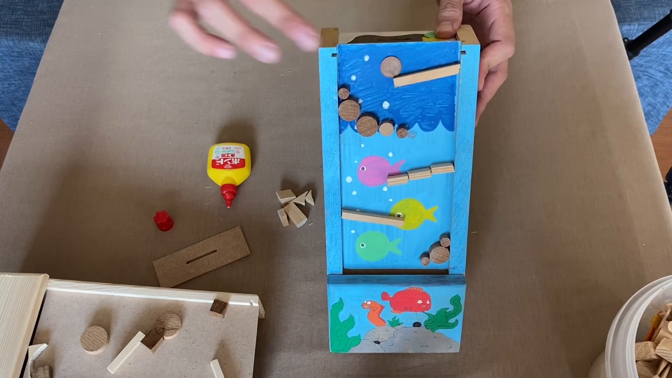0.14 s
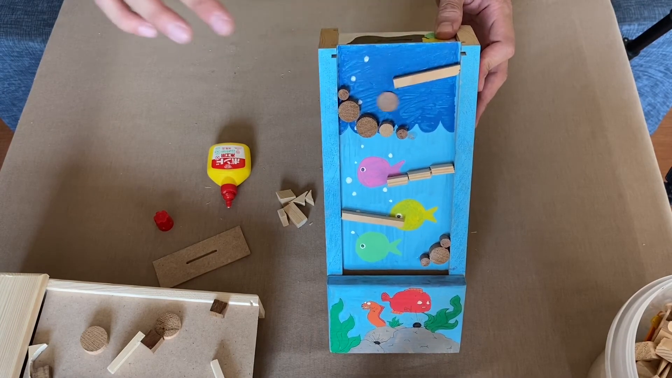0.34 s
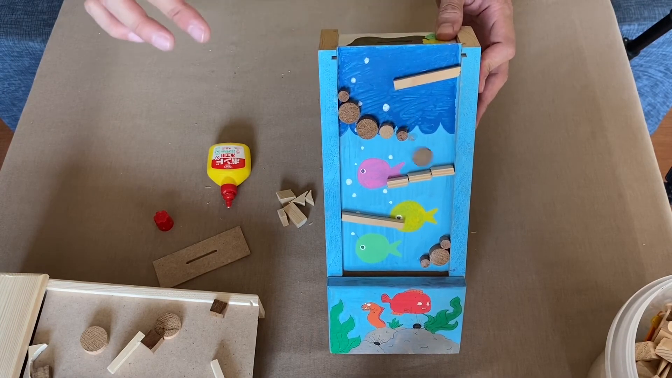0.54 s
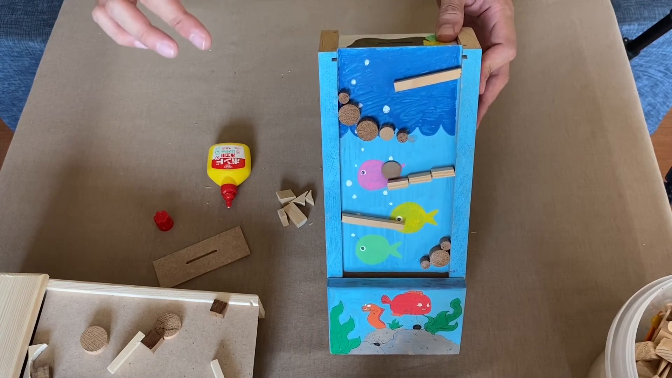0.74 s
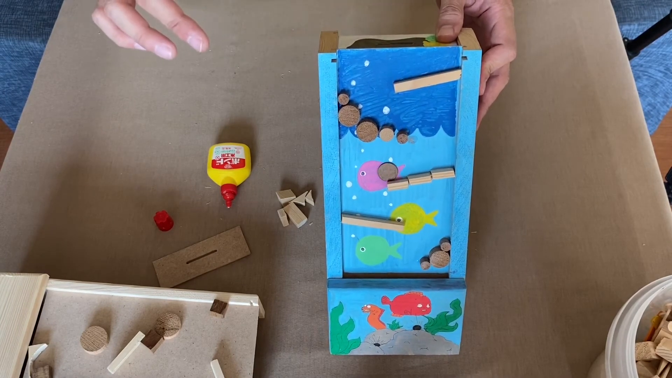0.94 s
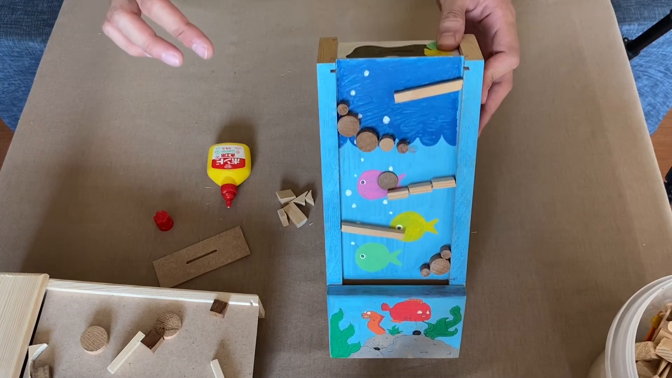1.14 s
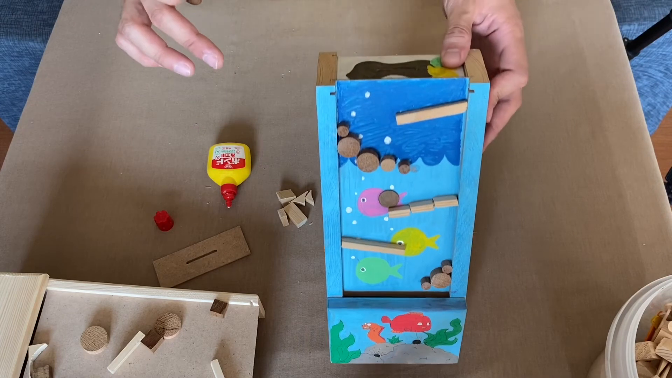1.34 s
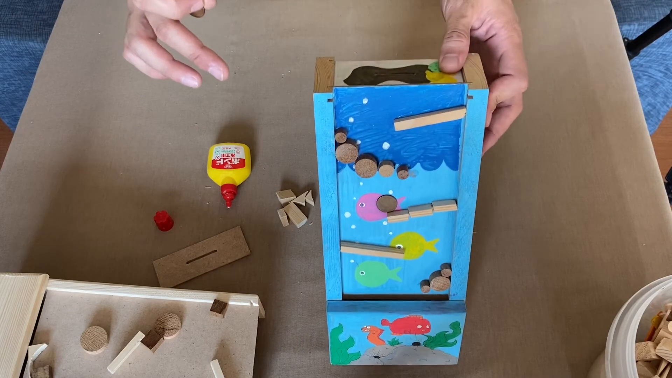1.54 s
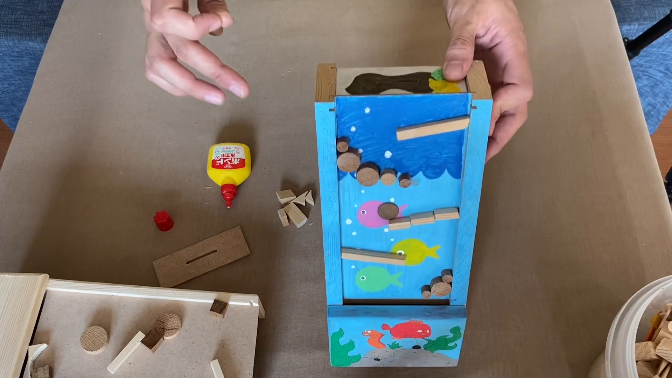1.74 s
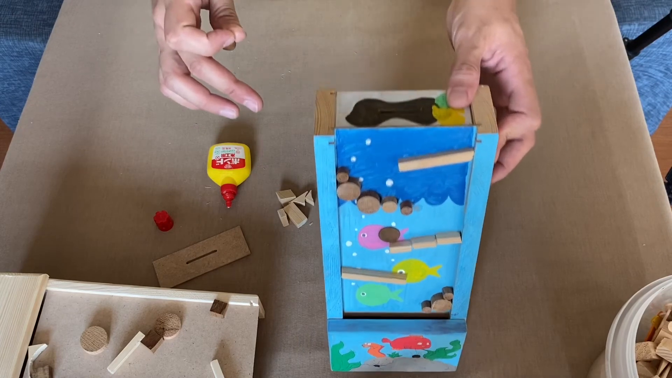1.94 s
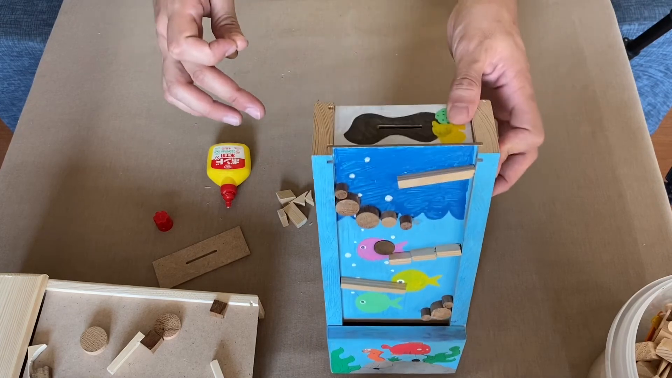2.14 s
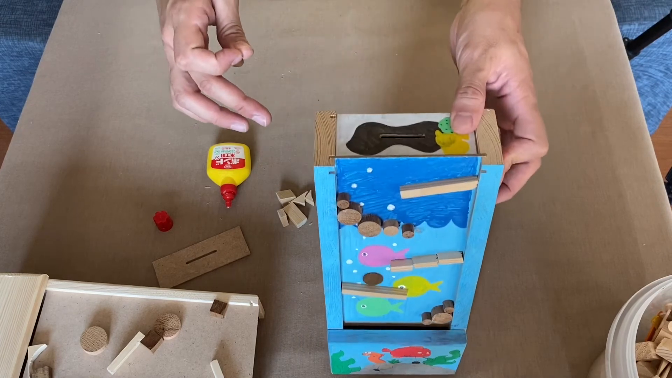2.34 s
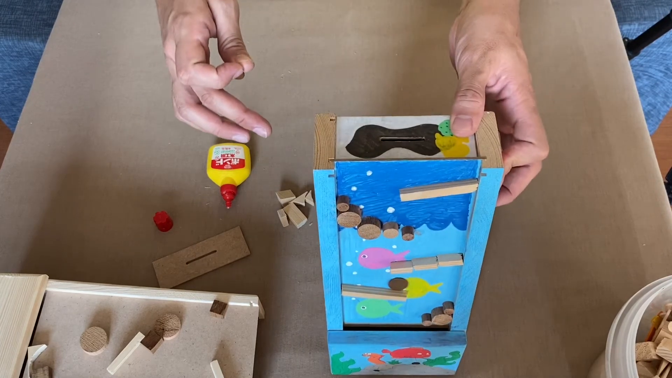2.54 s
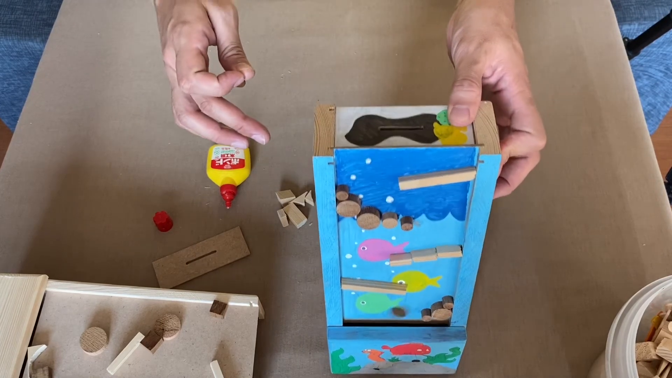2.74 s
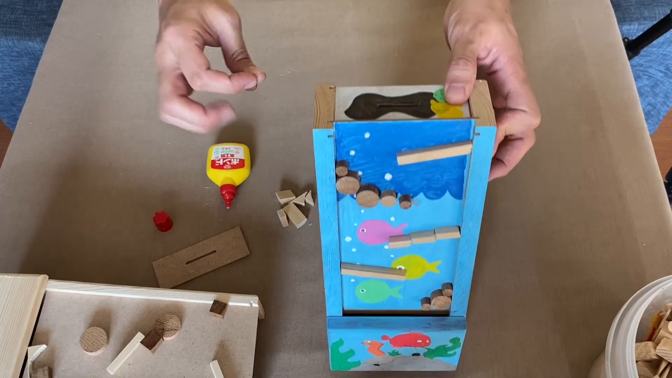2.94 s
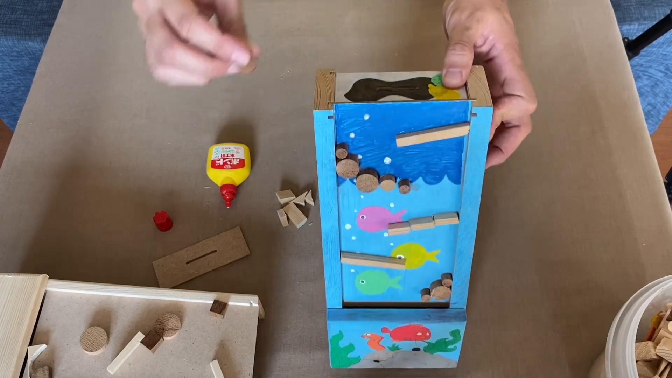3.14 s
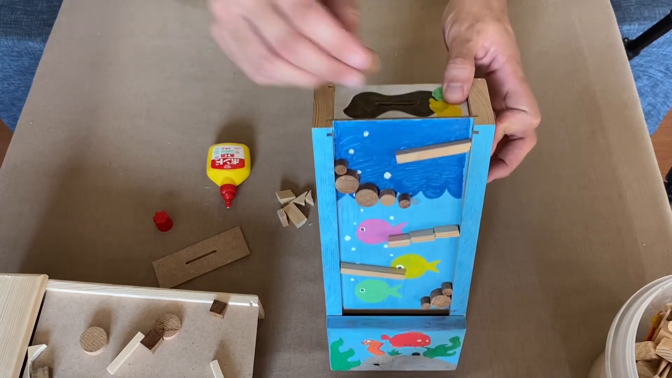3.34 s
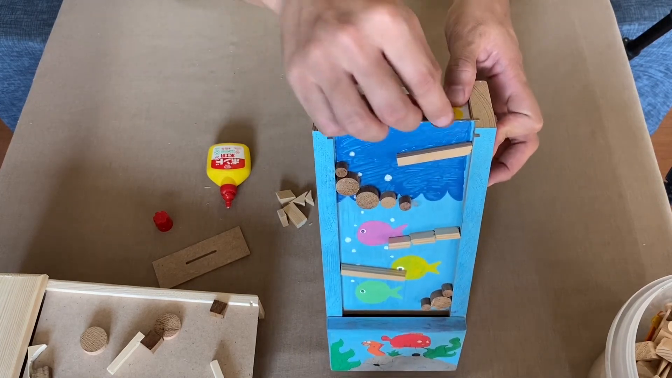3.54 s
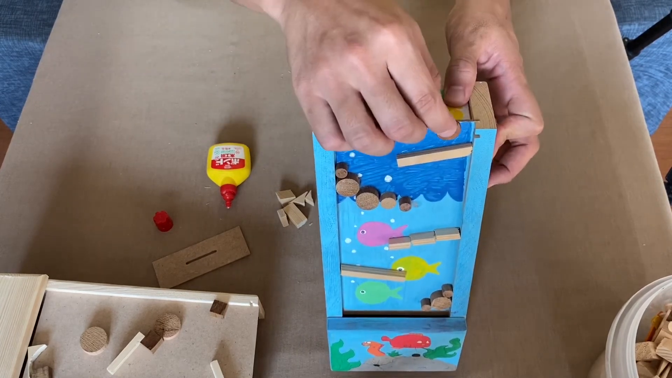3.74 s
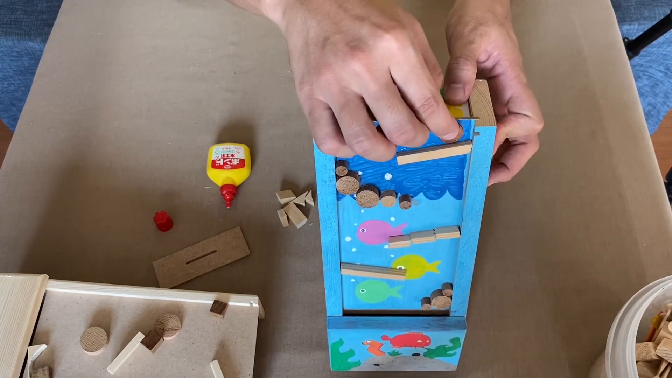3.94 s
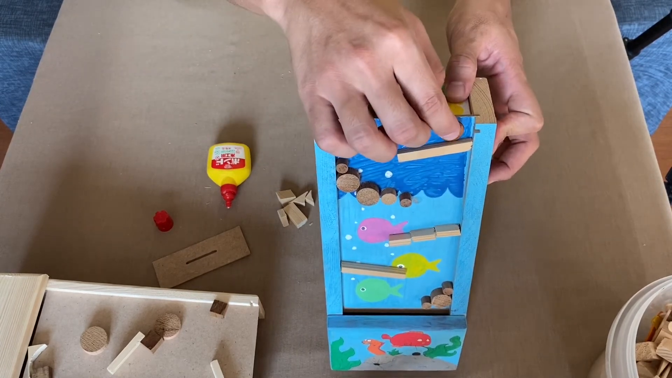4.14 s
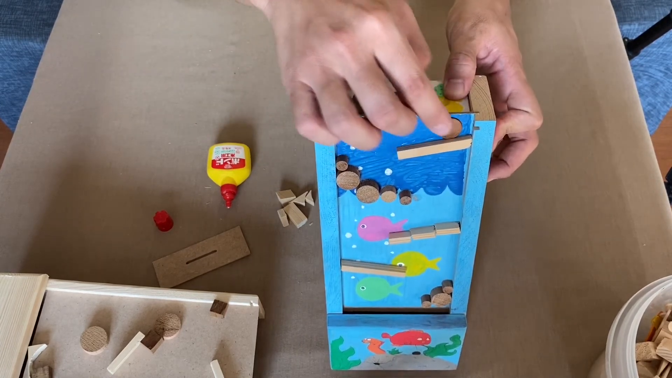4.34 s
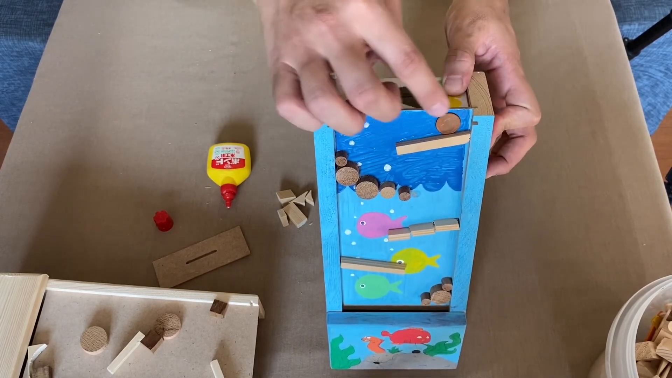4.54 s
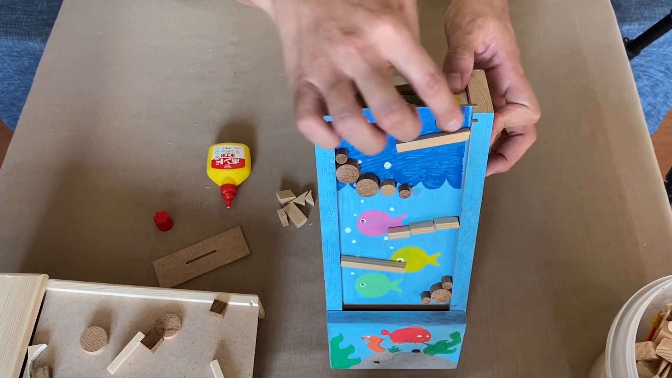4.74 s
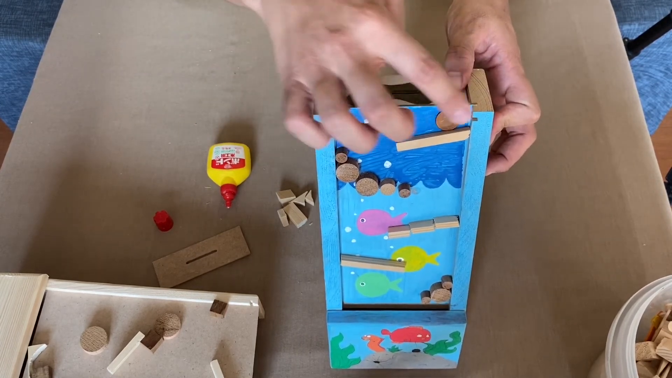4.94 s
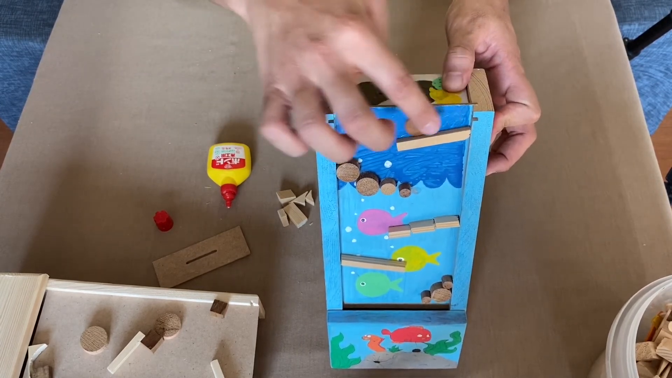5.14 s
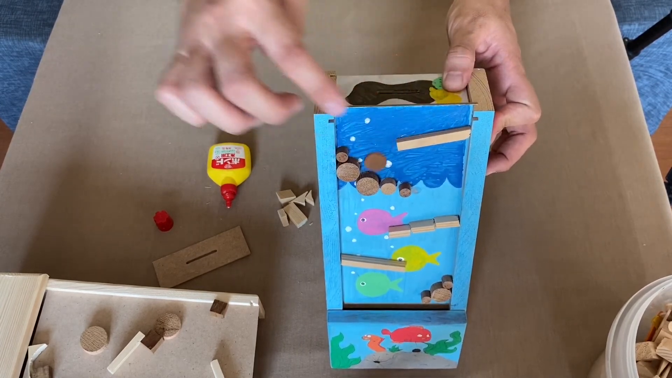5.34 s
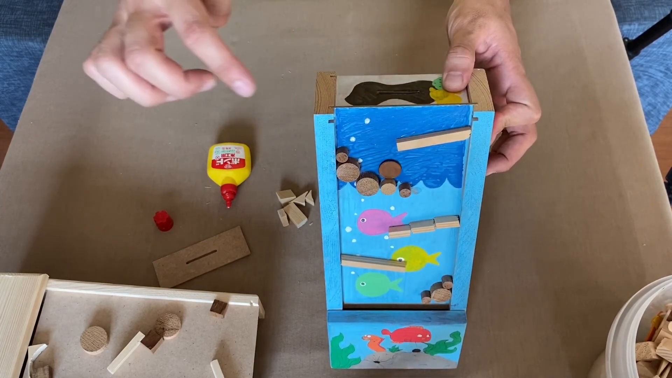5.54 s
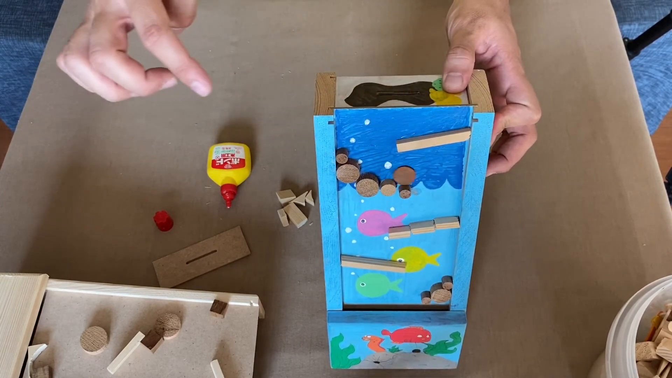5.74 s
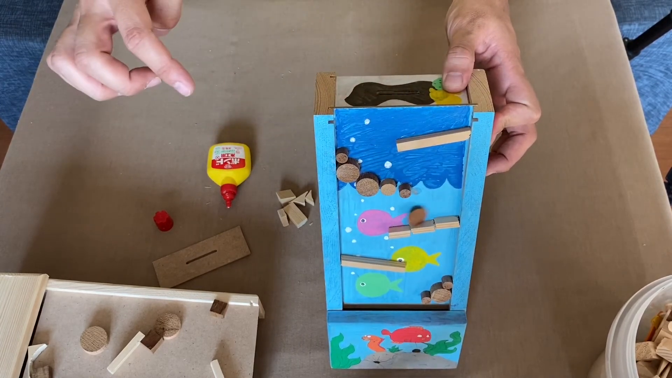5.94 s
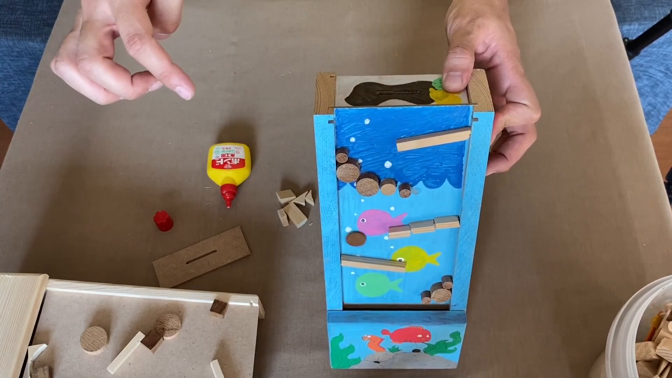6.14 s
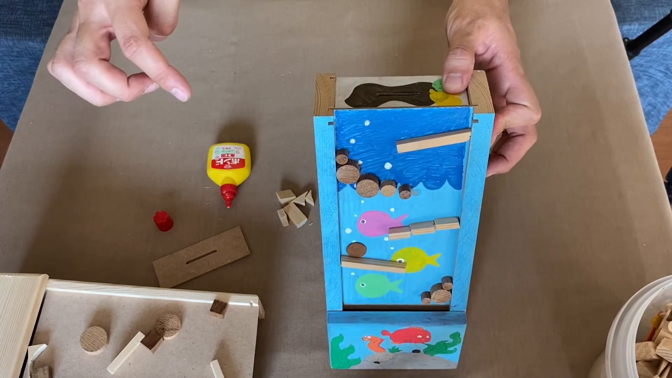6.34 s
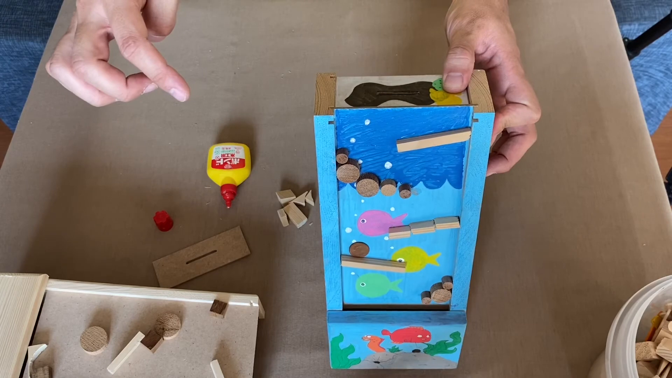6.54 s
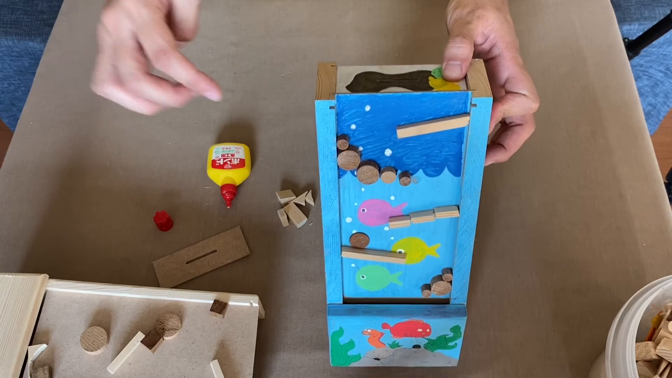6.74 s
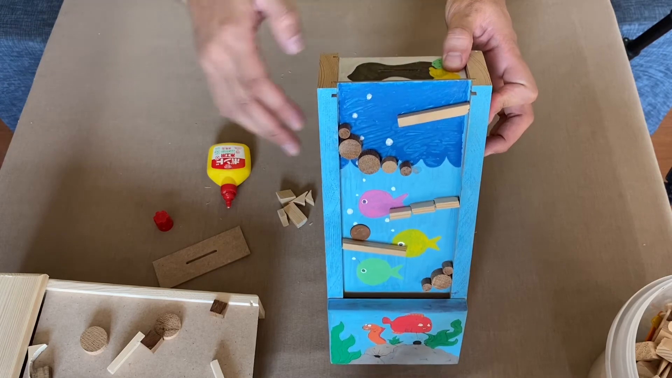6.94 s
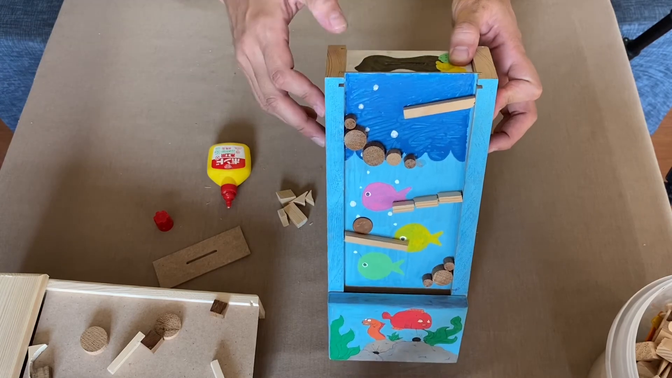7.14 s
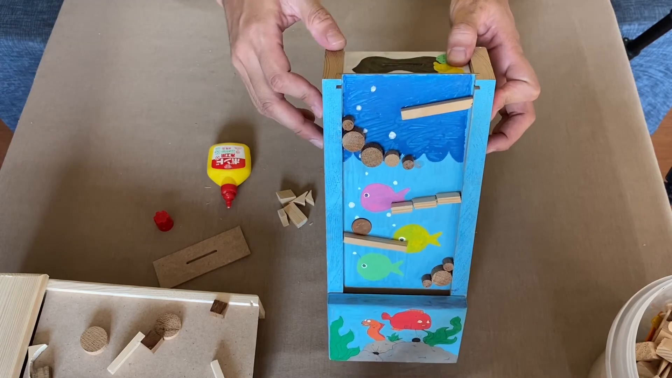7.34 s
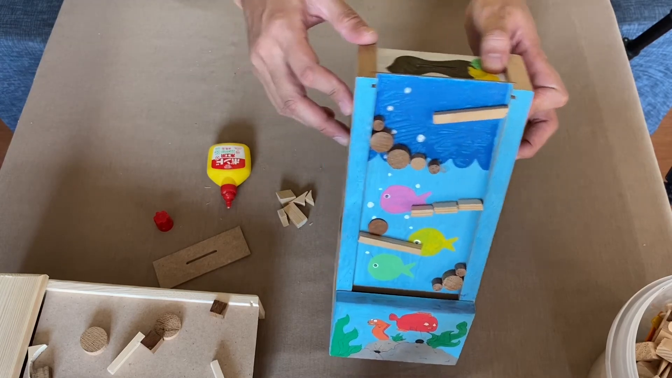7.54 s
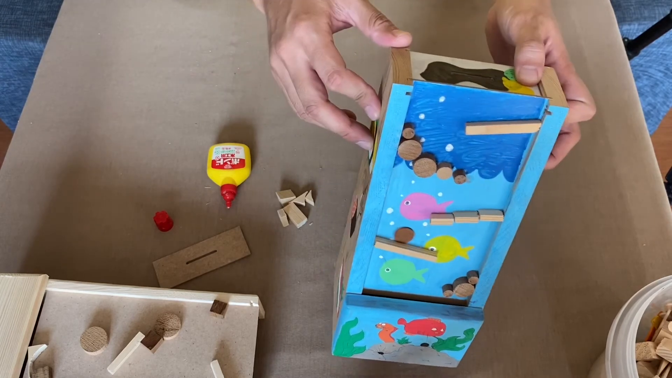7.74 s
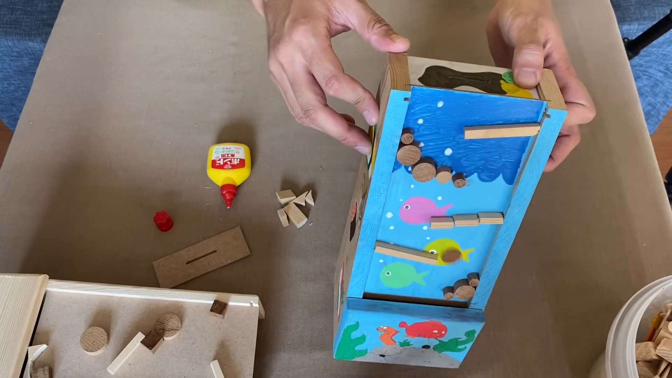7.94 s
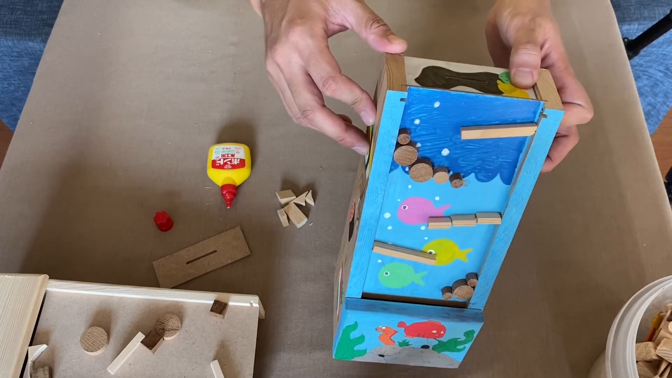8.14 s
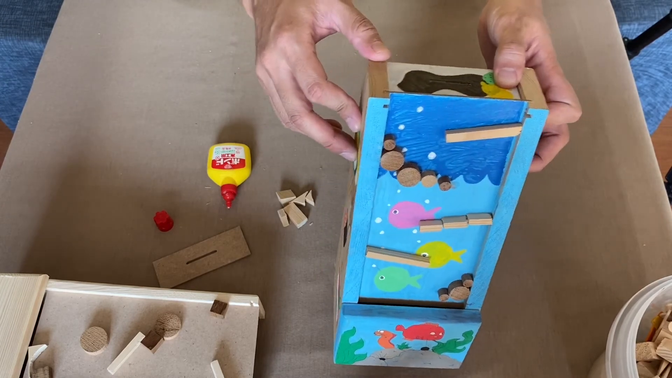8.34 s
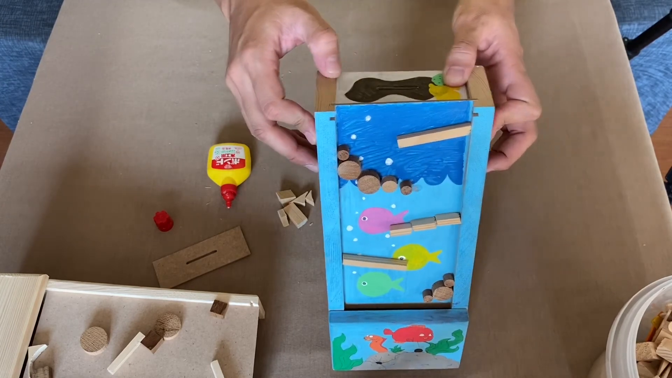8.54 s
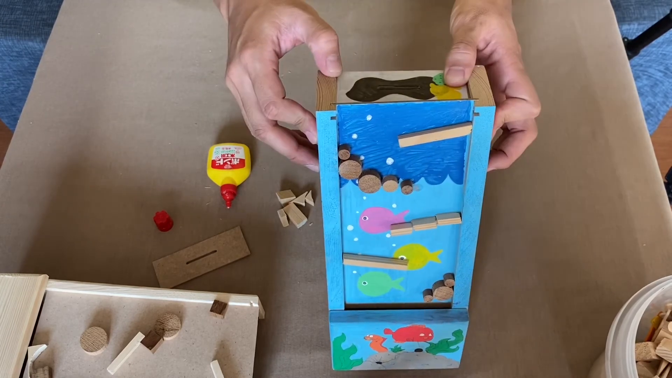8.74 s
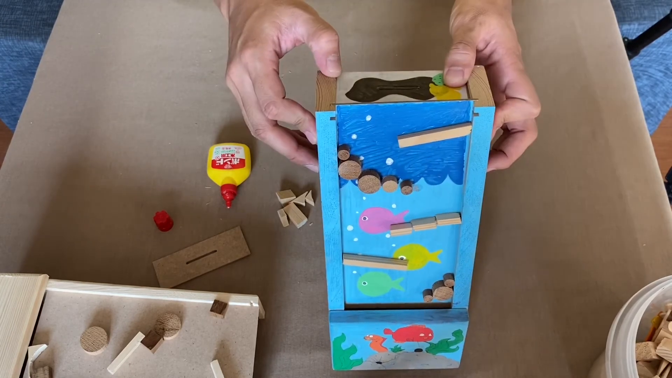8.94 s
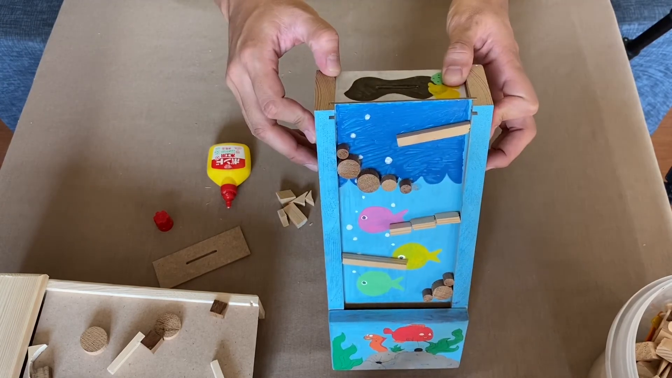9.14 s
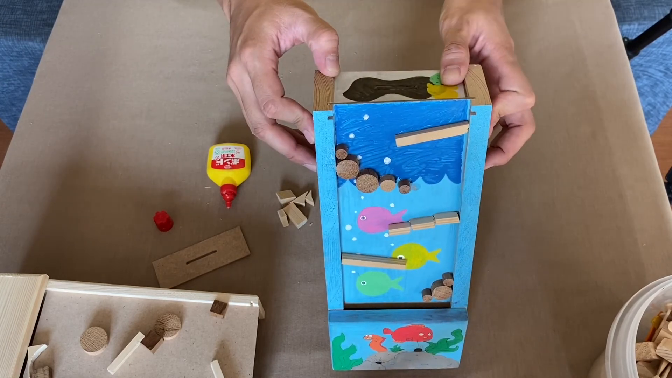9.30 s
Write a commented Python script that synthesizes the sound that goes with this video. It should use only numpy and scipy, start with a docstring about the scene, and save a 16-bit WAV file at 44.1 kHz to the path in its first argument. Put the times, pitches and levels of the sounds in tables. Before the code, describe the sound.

Close, dry wooden clacks and rattling rolls as coins bounce down a zigzag toy; one pauses, then tips free with sharp knocks.

```python
"""Small room: coins run down a hand-held wooden money box with a zigzag of ramps and pegs, heard close.
Coins roll, click on pegs, bounce on ledges and drop into the hollow base; one sticks and is tilted free.
Blows are noise bursts plus damped modes; rolling and rubbing are filtered random taps.
Hands rumble, the room rushes low, and the hardest blows overload the microphone."""
import sys
import numpy as np
from scipy import signal
from scipy.fft import rfft, irfft, next_fast_len
from scipy.io import wavfile
from scipy.ndimage import map_coordinates

SR = 44100
rng = np.random.default_rng(int(sys.argv[2]) if len(sys.argv) > 2 else 0)


def unload_wav(signal):
    """Save mono or channel-first audio to the path in sys.argv[1] as 16-bit WAV at rate SR, clipped to [-1, 1]."""
    wavfile.write(
        sys.argv[1],
        SR,
        np.round(np.clip(np.atleast_2d(signal).T, -1, 1) * 32767).astype(np.int16),
    )


N = 417627

# Flatness: above 0 face-on and dull, below 0 edge-on and bright.
# top ramp and round pegs: start_s, level_db, flatness_db
PEG_HITS = [(0.301, -2.5, -0.5), (0.36, -12.5, 1), (0.393, -5, -2), (0.446, -17.5, -13), (0.528, -9.5, 0.5),
            (0.614, -16.5, 10.5), (0.693, -25, 6), (2.641, -15.5, -4.5), (2.676, -12, -1.5),
            (2.698, -4, -2.5), (5.237, -22, 2), (5.263, -17, 1.5), (5.289, -12.5, -8), (5.308, 3.5, -7.5),
            (5.409, -1, 1.5), (5.458, -8, 3.5), (5.489, -6, 1.5), (5.547, -8, 0.5), (5.699, -9, 7.5),
            (5.811, -11.5, -10), (5.953, -8, 4.5), (5.97, -14, 11.5), (7.853, -28, 6.5), (7.894, -20, 2.5),
            (7.925, -16, -1.5), (7.933, -9.5, 3.5), (7.95, 2.5, -7.5), (7.986, -8, -11.5),
            (8.105, -18.5, -9.5)]
# lower ledges: start_s, level_db, flatness_db
LEDGE_HITS = [(2.246, 3, 0), (2.339, -1.5, -4), (2.391, -7.5, -4), (2.418, -10, 2), (5.88, 4.5, 4),
              (5.996, -7.5, 1.5), (6.05, -10.5, 0), (6.073, 2, 3.5), (6.179, -1, -1), (6.229, -9, -5),
              (6.257, -17.5, -11)]
# side wall at the exit: start_s, level_db, flatness_db
WALL_HITS = [(2.8335, 10, 3), (8.2645, 2, -12.5)]
# landings and bounces in the hollow base: start_s, level_db, flatness_db, hollow_note_hz
BASE_HITS = [(3.003, 9, 2, 1007), (3.027, -6.5, 1, 567), (3.066, 2, 3.5, 793), (3.12, -0.5, -5.5, 494),
             (3.138, -4, 2, 487), (3.339, -17.5, 3, 490), (3.491, -3, -2, 796), (3.556, -6.5, 1.5, 820),
             (3.598, -7.5, -3, 974), (8.138, 10.5, 0.5, 993), (8.186, -9.5, 4, 1000), (8.25, 3, -0.5, 986),
             (8.356, -8, 0, 791), (8.424, -3, -3, 796), (8.476, -0.5, -3, 844)]
# resonances of each struck part: mode_hz, width_hz, level_db
PEG_MODES = [(542.7, 6.2, 0.5), (798, 15, -2.5), (1064, 34, -7), (1517, 60, -6.5), (2457, 190, 10.5),
             (2880, 22, -1.5), (3160, 9.3, -15), (3758, 200, -5), (4250, 31, -1), (5170, 49, -14),
             (5240, 47, -5.5)]
LEDGE_MODES = [(545, 35, -12), (800, 70, -13), (1320, 45, -8), (1500, 55, -8), (1820, 70, -5),
               (1945, 65, -1), (2150, 110, -8), (2920, 90, -5), (3075, 62, 3), (3380, 70, -7),
               (3900, 170, -3), (4220, 140, -6), (4950, 160, -8), (5700, 220, -8), (6120, 170, -12)]
WALL_MODES = [(540, 40, -14), (960, 40, -1), (1015, 40, -2), (1885, 60, -2), (2030, 110, -4),
              (2500, 110, -5), (2880, 110, -6), (3370, 60, 4), (3700, 80, -9), (4390, 50, -5),
              (4850, 180, -9)]
BASE_MODES = [(495, 17, -6), (600, 8.1, -3.5), (773, 27, 1.5), (914, 22, -1.5), (1041, 29, 4.5),
              (1355, 67, 4), (1852, 96, -13.5), (2020, 41, -16.5), (2295, 200, 5), (2990, 38, 1),
              (2910, 28, -20.5), (3480, 210, -23), (4720, 24, -6.5), (4874, 120, -2.5), (5250, 100, -0.5)]
# back panel under a rolling coin: mode_hz, width_hz, level_db
PANEL_MODES = [(395, 50, -16), (570, 22, 0), (785, 35, -9), (1080, 50, -16), (1335, 55, -11)]
# ramps under a rolling coin: mode_hz, width_hz, level_db
RAMP_MODES = [(1338, 31, -3), (1970, 51, -0.5), (2380, 240, -3.5), (3034, 51, -1), (3385, 290, -9),
              (5400, 400, -11)]
# dense, quickly damped plywood vibration: freq_hz, gain_db
PLY_SPECTRUM = [(60, -36), (250, -6.5), (500, -3), (1150, -3.5), (1600, 2), (3000, 4), (4200, -3),
                (6000, -6), (7300, -25), (10000, -14.5), (13000, -32), (16000, -25.5)]
# click of the metal edge: freq_hz, gain_db
RIM_SPECTRUM = [(2000, -35.5), (6000, -5.5), (8000, 1), (10500, 1), (13000, -6.5), (16000, -8.5)]
# coin scraping along the ramp: freq_hz, gain_db
SCRAPE_SPECTRUM = [(210, -41), (350, -11), (535, -14.5), (677, -10), (793, -3.5), (1210, -23.5),
                   (1310, -9.5), (3020, -19.5), (6030, -29.5), (7280, -40), (9210, -25.5), (15000, -41.5)]
# skin on wood: freq_hz, gain_db
SKIN_SPECTRUM = [(300, -10.5), (1000, 2), (3000, -3), (6000, -7.5), (7500, -19), (10000, -9),
                 (15000, -20.5)]
# hands moving the box: freq_hz, gain_db
RUMBLE_SPECTRUM = [(15, -14), (30, 2), (60, 1), (130, 1), (300, -32), (1000, -71.5)]
# four runs of rolling and sliding, one list each: time_s, level_db
ROLL_RUNS = [
    [(0.0, -48), (0.28, -41), (0.458, -33.5), (0.548, -41.5), (0.65, -40.5), (0.782, -51), (0.86, -63.5)],
    [(2.1, -52), (2.172, -41.5), (2.32, -48.5), (2.502, -48), (2.788, -43.5), (2.83, -44)],
    [(4.98, -40.5), (5.404, -41), (5.554, -49.5), (5.782, -39.5), (5.904, -31.5), (5.998, -39),
     (6.106, -37.5), (6.244, -52), (6.32, -49)],
    [(7.6, -52), (7.778, -41), (8.022, -39.5), (8.094, -37), (8.388, -41), (8.43, -38), (8.548, -48.5),
     (8.6, -48.5)],
]
# back-panel booms where a coin gathers speed: start_s, level_db, rise_s
BOOMS = [(0.37, -41, .03), (0.64, -45, .03), (0.765, -39, .01), (2.715, -36, .03), (5.9, -39, .03),
         (7.925, -27.5, .035)]
# short coin slides and grazes, at the slot, along a ledge or just before a hard landing: start_s, level_db,
# rise_s
SLIDES = [(-0.02, -31.5, 0.014), (0.240, -28, 0.034), (2.160, -41.5, 0.021), (2.203, -33.5, 0.023),
          (3.481, -29.5, 0.0067), (5.005, -28.5, 0.013), (5.06, -36.5, .008), (5.868, -24.5, .005)]
# fingers shifting on the box: start_s, level_db, rise_s
RUBS = [(1.27, -65, 0.022), (1.68, -64, 0.018), (3.70, -54, 0.026), (3.83, -51, 0.035), (4.72, -68.5, .04),
        (6.60, -62, 0.05), (9.165, -52, 0.0089), (9.24, -49.5, .018)]
# dull hand rumbles: start_s, level_db, rise_s
BUMPS = [(0.15, -52, .08), (0.42, -50.5, .1), (1.6, -52, .06), (4.88, -55.5, .08)]
# room background: freq_hz, gain_db
AIR_SPECTRUM = [(12, -56.5), (20, -27.5), (42, -8), (197, 0), (344, -4), (374, -5.5), (406, -5), (508, -8),
                (1050, -14), (3890, -37.5), (5140, -44.5), (6080, -43.5), (7190, -64.5), (9770, -45),
                (15700, -68.5)]
# left-right likeness of the background: freq_hz, correlation
AIR_ALIKE = [(60, 0.96), (180, 0.94), (550, 0.08), (1650, 0.32), (4970, 0.15), (15000, 0.2)]
# phase by which the left port leads: freq_hz, lead_rad
PORT_LEAD = [(20, 0), (1700, 0.74), (2700, 0.45), (4200, 1.48), (5200, 0.98), (7500, 2.5), (10000, 9),
             (15000, -3)]
# room reverberation: freq_hz, t60_s
ROOM_T60 = [(200, 0.45), (530, 0.39), (1400, 0.41), (3700, 0.39), (9700, 0.29)]

TOP_HZ = 16000  # microphone band limit
HIT_SAMPLES = SR // 4
THUD_DB_PER_FLAT_DB, TICK_LOSS_DB_PER_FLAT_DB = 0.77, 0.43
THUD_FALL_DB_PER_DB = 0.31  # thud lags the force
ROLL_FADE_S = 0.044
LEDGE_NOTE_HZ = 3072


def amp(db):
    """Decibels to gain."""
    return 10 ** (np.asarray(db) / 20)


def unit(x):
    """Scale to rms 1."""
    return x / np.sqrt(np.mean(x ** 2) + 1e-20)


def along(points, hz):
    """Interpolate (freq_hz, value) points on a log frequency axis."""
    freq_hz, value = np.transpose(points)
    return np.interp(np.log(hz + 1), np.log(freq_hz + 1), value)


def filtered(x, response):
    """Apply a complex frequency response."""
    n = x.shape[-1]
    m = next_fast_len(n + 8192)
    return irfft(rfft(x, m) * response(np.fft.rfftfreq(m, 1 / SR)), m)[..., :n]


def coloured(x, gain):
    """Minimum-phase filter of a short sound: nothing rings before the blow."""
    m = 2 * len(x)
    log_gain = np.log(np.maximum(gain(np.fft.rfftfreq(m, 1 / SR)), 1e-6))
    cepstrum = irfft(log_gain)
    # fold the cepstrum onto positive time
    cepstrum[1:m // 2] *= 2
    cepstrum[m // 2 + 1:] = 0
    return irfft(rfft(x, m) * np.exp(rfft(cepstrum)))[:len(x)]


def band_rms(x, lo_hz, hi_hz):
    """Strength of one band over the first 20 ms of a blow."""
    head = x[:SR // 50]
    hz = np.fft.rfftfreq(len(head), 1 / SR)
    band = rfft(head)[(hz > lo_hz) & (hz < hi_hz)]
    return np.sqrt(2 * np.sum(np.abs(band) ** 2)) / len(head)


def room(x, wet_db):
    """Direct sound at two microphone ports plus a diffuse tail with frequency-dependent decay."""
    hz, t, noise = signal.stft(rng.standard_normal((3, SR // 2)), SR, nperseg=256)
    decay = amp(-60 * t / along(ROOM_T60, hz)[:, None])
    build_up = 1 - np.exp(-t / 0.0022)
    tails = signal.istft(noise * decay * build_up, SR, nperseg=256)[1]
    tail = tails[:2] + 0.67 * tails[2]  # the third is common to both ports
    wet = signal.fftconvolve(x[None], tail / np.linalg.norm(tail[0]), axes=1)
    half_lead = np.array([[.5], [-.5]])
    direct = filtered(x, lambda f: np.exp(1j * along(PORT_LEAD, f) * half_lead))
    return amp(wet_db) * wet + np.pad(direct, ((0, 0), (0, wet.shape[1] - len(x))))


def place(out, start_s, sound):
    """Add a stereo sound at its start time."""
    out[:, round(start_s * SR):][:, :sound.shape[1]] += sound


def taps(rate_hz, spread_db):
    """Random tiny impacts of very unequal strength."""
    struck = rng.random(N) < rate_hz / SR
    return struck * rng.standard_normal(N) * amp(spread_db * rng.standard_normal(N))


def swells(strokes):
    """Envelope of strokes that swell softly, peak one rise_s after the start, and fade."""
    t = np.arange(N) / SR
    pressure = np.zeros(N)
    for start_s, level_db, rise_s in strokes:
        u = np.clip((t - start_s) / rise_s, 0, 20)
        pressure += amp(level_db) * u * np.exp(1 - u)
    return pressure


def background(level_db, pan_db):
    """Steady low room rush: left and right alike in the bass, largely independent above."""
    def mid_side(f):
        turn_rad = np.arccos(np.clip(along(AIR_ALIKE, f), -1, 1)) / 2
        return amp(along(AIR_SPECTRUM, f)) * [np.cos(turn_rad), np.sin(turn_rad)]

    mid, side = filtered(rng.standard_normal((2, N)), mid_side)
    return amp(level_db) * unit(np.array([mid + side, mid - side])) * amp([[pan_db], [-pan_db]])


def friction(strokes, spectrum, level_db):
    """Rubbing: coloured grain contacts under each stroke's pressure."""
    contacts = taps(rate_hz=1800, spread_db=3)
    grain = unit(filtered(contacts, lambda f: amp(along(spectrum, f))))
    return room(amp(level_db) * swells(strokes) * grain, wet_db=-5)[:, :N]


def hands():
    """Fingers rub the wood; moving the box adds dull rumble."""
    return friction(RUBS, SKIN_SPECTRUM, level_db=1.5) + friction(BUMPS, RUMBLE_SPECTRUM, level_db=4)


def travelled(contacts, modes):
    """Modes under a moving coin: each swells and fades at random as the coin crosses its nodes."""
    t, out = np.arange(N) / SR, np.zeros(N)
    for mode_hz, width_hz, level_db in modes:
        ring = np.exp(-np.pi * width_hz * t[:HIT_SAMPLES]) * np.sin(2 * np.pi * mode_hz * t[:HIT_SAMPLES])
        coupling_db = 3.5 * map_coordinates(rng.standard_normal(140), [t * 12], order=1)
        out += amp(level_db + coupling_db) * unit(signal.oaconvolve(contacts, ring)[:N])
    return unit(out)


def rolling(scrape_db, ramp_db, hum_db, rattle_db, wobble_db, wet_db):
    """Rim taps over the ramp grain excite ramp and back panel; the coin wobbles and rattles."""
    t = np.arange(N) / SR
    level = np.zeros(N)
    for run in ROLL_RUNS:
        time_s, run_db = np.transpose(run)
        fade = np.clip(np.minimum(t - time_s[0], time_s[-1] - t) / ROLL_FADE_S, 0, 1)
        level += amp(np.interp(t, time_s, run_db)) * fade
    wobble = map_coordinates(rng.standard_normal(600), [t * 45])  # 45 random points a second
    contacts = taps(rate_hz=1800, spread_db=2.5) * amp(wobble_db * wobble)

    scrape = amp(scrape_db) * unit(filtered(contacts, lambda f: amp(along(SCRAPE_SPECTRUM, f))))
    ramp = amp(ramp_db) * travelled(contacts, RAMP_MODES)

    burst = rng.standard_normal(HIT_SAMPLES) * amp(-60 * t[:HIT_SAMPLES] / .03)
    tick = coloured(burst, lambda f: amp(along(PLY_SPECTRUM, f)))
    rattle = amp(rattle_db) * unit(signal.fftconvolve(taps(rate_hz=75, spread_db=1.5), tick)[:N])

    hum = (amp(hum_db) * level + swells(BOOMS)) * travelled(contacts, PANEL_MODES)
    return room(level * (scrape + ramp + rattle) + hum, wet_db)[:, :N]


def coins_moving():
    """Coins roll down the ramps and slide briefly, wood and metal rim both sounding."""
    rolls = rolling(scrape_db=-1.5, ramp_db=-4.5, hum_db=-4, rattle_db=-6.5, wobble_db=-1.0, wet_db=-9.5)
    wood = friction(SLIDES, PLY_SPECTRUM, level_db=-3)
    metal = friction(SLIDES, RIM_SPECTRUM, level_db=-20)
    return rolls + wood + metal


def notes(blows, level_db, t60_s, wet_db):
    """One decaying sine for each (start_s, level_db, note_hz) blow."""
    out, t = np.zeros((2, N + SR)), np.arange(HIT_SAMPLES) / SR
    for start_s, blow_db, note_hz in blows:
        envelope = amp(blow_db + level_db - 60 * t / t60_s) * (1 - np.exp(-t / 0.0014))
        place(out, start_s, room(envelope * np.sin(2 * np.pi * note_hz * t), wet_db))
    return out[:, :N]


def ringing(modes, scatter_db, detune):
    """Damped modes, the wider the shorter; strength and pitch vary a little with the struck spot."""
    mode_hz, width_hz, level_db = np.transpose(modes)[:, :, None]
    t = np.arange(HIT_SAMPLES) / SR
    mode_hz = mode_hz * (1 + detune * rng.standard_normal(mode_hz.shape))
    gain = amp(level_db + scatter_db * rng.standard_normal(mode_hz.shape))
    size = gain * np.sqrt(width_hz) * rng.choice([-1, 1], mode_hz.shape)
    return unit(np.sum(size * np.exp(-np.pi * width_hz * t) * np.sin(2 * np.pi * mode_hz * t), axis=0))


def strikes(hits, modes, clack_db, thud_db, knock_db, tick_db, knock_fall, tick_rise, ring_db,
            ply_t60_s, snap_db, rim_db, rim_t60_s, wet_db):
    """Coin on wood: sharp snap, dense ply vibration, modes of the struck part and a rim click."""
    out, t = np.zeros((2, N + SR)), np.arange(HIT_SAMPLES) / SR
    spread = 1 - np.exp(-t / 0.00088)  # vibration takes a moment to fill the panels
    decay = amp(-60 * t / ply_t60_s) + amp(snap_db - 60 * t / 0.013)
    for start_s, level_db, flat_db, *_ in hits:
        burst = coloured(rng.standard_normal(HIT_SAMPLES) * decay, lambda f: amp(along(PLY_SPECTRUM, f)))
        blow = spread * (unit(burst) + amp(ring_db) * ringing(modes, scatter_db=2, detune=0.003))

        # soft or flat landings thud and knock low; hard or edge-on ones tick high
        thud = thud_db - THUD_FALL_DB_PER_DB * level_db + THUD_DB_PER_FLAT_DB * flat_db
        knock = knock_db - knock_fall * level_db + flat_db
        tick = tick_db + tick_rise * level_db - TICK_LOSS_DB_PER_FLAT_DB * flat_db
        deep = amp(thud) / band_rms(blow, 250, 530)
        low = amp(knock) / band_rms(blow, 530, 1300)
        middle = amp(clack_db) / band_rms(blow, 1300, 3600)
        high = amp(tick) / band_rms(blow, 3600, 7000)
        contact = [(470, deep), (580, low), (1080, low), (1450, middle), (3300, middle), (4000, high)]
        blow = coloured(blow, lambda f: along(contact, f))

        rim_burst = rng.standard_normal(HIT_SAMPLES) * amp(-60 * t / rim_t60_s) * spread
        rim = coloured(rim_burst, lambda f: amp(along(RIM_SPECTRUM, f)))
        force_db = 1.6 * level_db  # rim grows faster than the blow: harder is brighter
        rim_click = room(amp(force_db + tick + rim_db) * rim, wet_db=-12)
        place(out, start_s, room(amp(level_db) * blow, wet_db) + rim_click)
    return out[:, :N]


def wall():
    """Side-wall blows at the exit: mostly snap, very short ply vibration."""
    return strikes(WALL_HITS, WALL_MODES, clack_db=-9.5, thud_db=-44, knock_db=-26, tick_db=-15.5,
                   knock_fall=0.16, tick_rise=.05, ring_db=-2.5, ply_t60_s=0.01, snap_db=9.0,
                   rim_db=2.5, rim_t60_s=0.022, wet_db=-11.5)


def ledges():
    """Ledge bounces: strong modes, plus one clear note shared by all the lower ledges."""
    clacks = strikes(LEDGE_HITS, LEDGE_MODES, clack_db=-14.5, thud_db=-37.5, knock_db=-28.5, tick_db=-14,
                     knock_fall=0.27, tick_rise=0.91, ring_db=5, ply_t60_s=0.044, snap_db=1.0,
                     rim_db=-11.5, rim_t60_s=.014, wet_db=-9.5)
    blows = [(start_s, level_db, LEDGE_NOTE_HZ) for start_s, level_db, _ in LEDGE_HITS]
    return clacks + notes(blows, level_db=-15, t60_s=0.064, wet_db=-12.5)


def base():
    """Landings in the hollow base: a clack plus the hollow note of the struck spot."""
    clacks = strikes(BASE_HITS, BASE_MODES, clack_db=-14.0, thud_db=-31.5, knock_db=-19.5, tick_db=-23.5,
                     knock_fall=0.071, tick_rise=0.082, ring_db=-2.5, ply_t60_s=0.063, snap_db=10.5,
                     rim_db=8.5, rim_t60_s=0.029, wet_db=-6.5)
    blows = [(start_s, level_db, note_hz) for start_s, level_db, _, note_hz in BASE_HITS]
    return clacks + notes(blows, level_db=-6.5, t60_s=0.063, wet_db=-9)


def pegs():
    """Clicks on the top ramp and pegs: modes over the longest ply vibration."""
    return strikes(PEG_HITS, PEG_MODES, clack_db=-15, thud_db=-33, knock_db=-26.5, tick_db=-21.5,
                   knock_fall=0.39, tick_rise=.05, ring_db=-3, ply_t60_s=0.078, snap_db=-0.5,
                   rim_db=-0.5, rim_t60_s=.016, wet_db=-8.5)


def scene():
    """Room, hands, moving coins and the four struck parts of the box."""
    quiet = background(level_db=-43.0, pan_db=-0.97) + hands()
    return quiet + coins_moving() + wall() + ledges() + base() + pegs()


def record(dry):
    """Microphone overload flattens peaks at full scale; a steep cut follows at TOP_HZ."""
    clipped = dry / (1 + np.abs(dry) ** 8) ** (1 / 8)
    return filtered(clipped, lambda f: 1 / (1 + (f / TOP_HZ) ** 80))


dry = scene()
out = record(dry)
unload_wav(out)
```